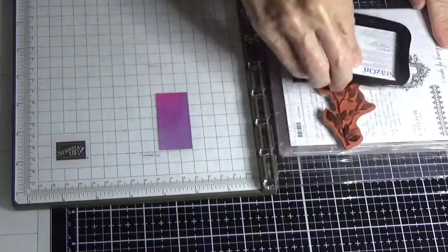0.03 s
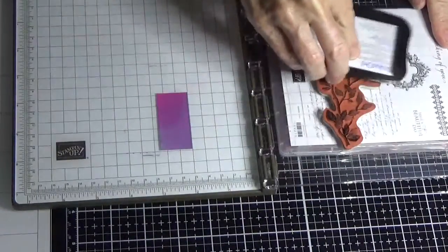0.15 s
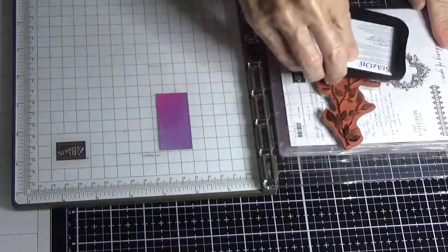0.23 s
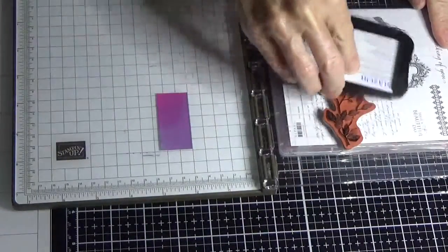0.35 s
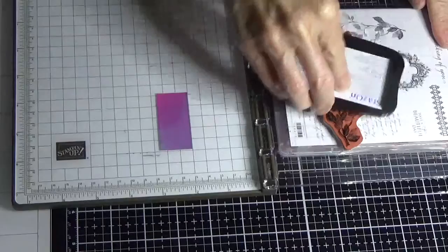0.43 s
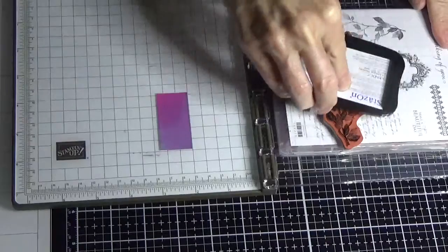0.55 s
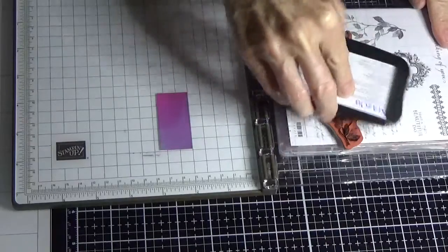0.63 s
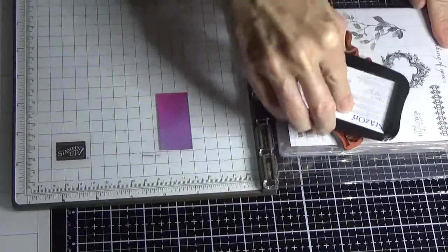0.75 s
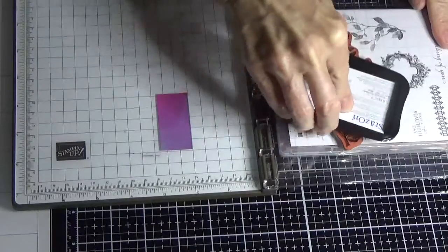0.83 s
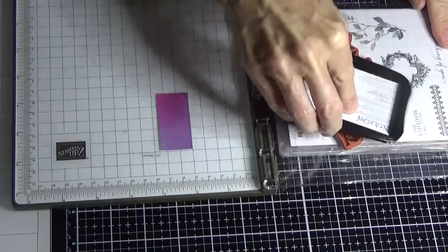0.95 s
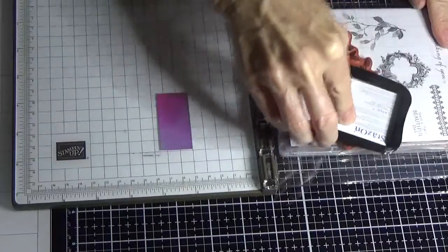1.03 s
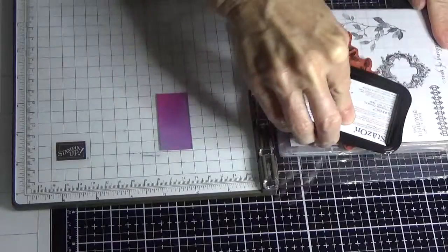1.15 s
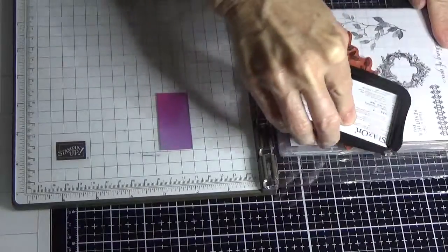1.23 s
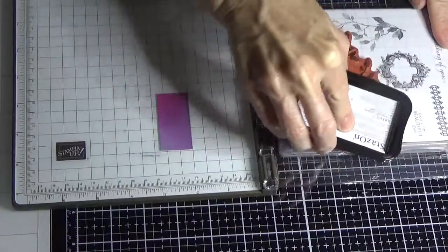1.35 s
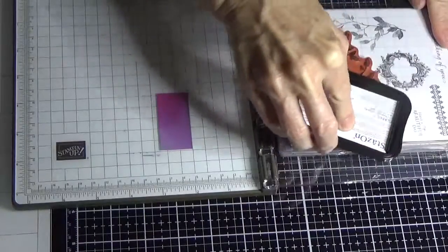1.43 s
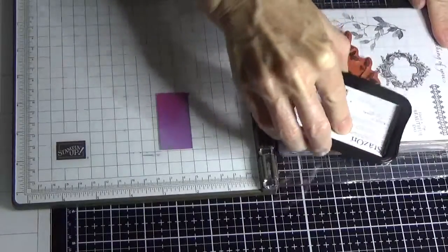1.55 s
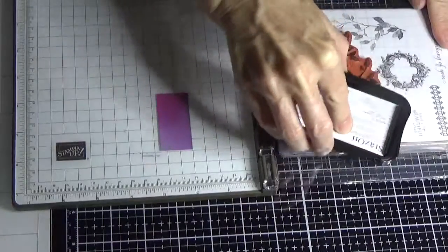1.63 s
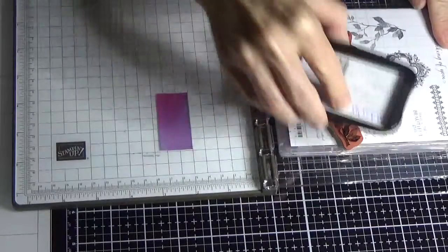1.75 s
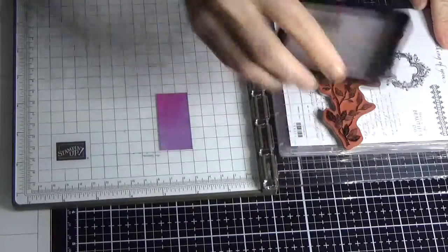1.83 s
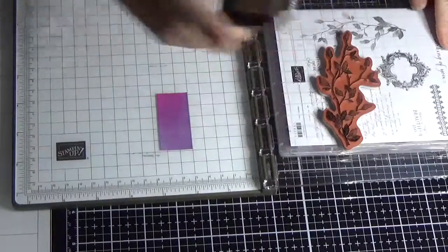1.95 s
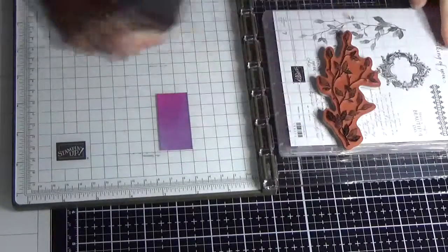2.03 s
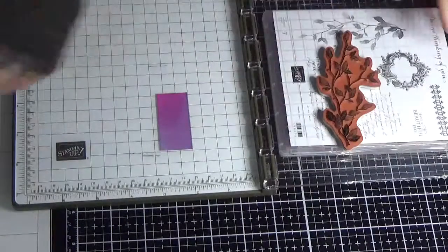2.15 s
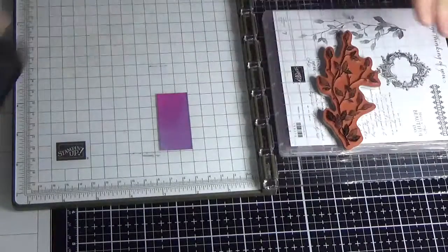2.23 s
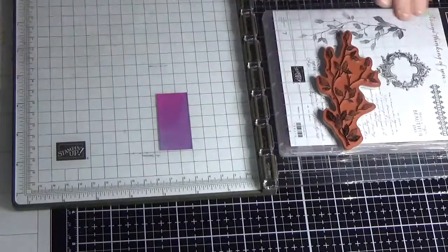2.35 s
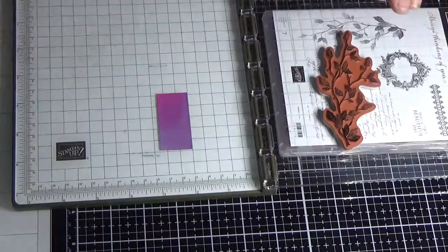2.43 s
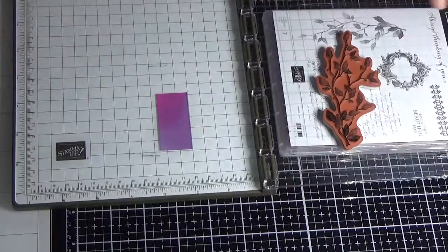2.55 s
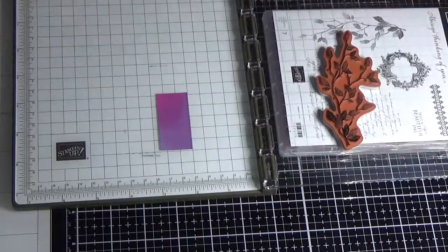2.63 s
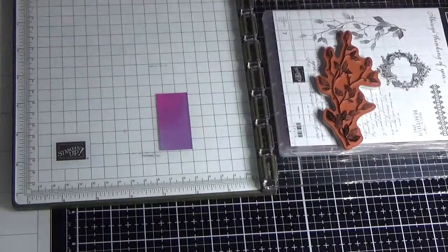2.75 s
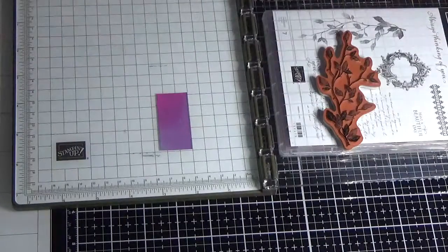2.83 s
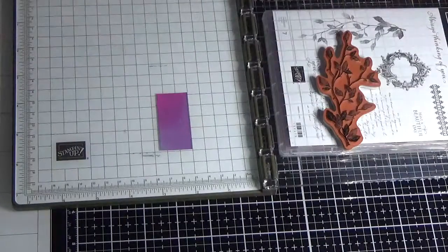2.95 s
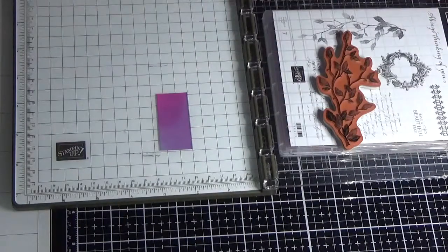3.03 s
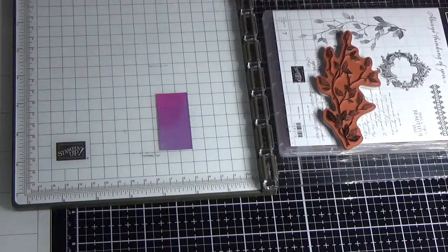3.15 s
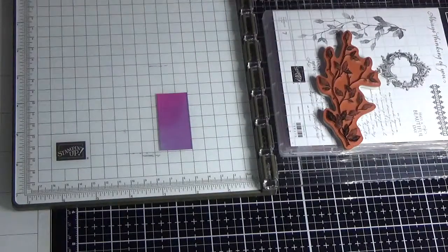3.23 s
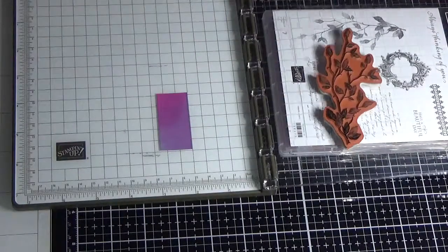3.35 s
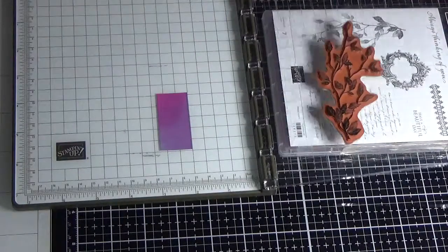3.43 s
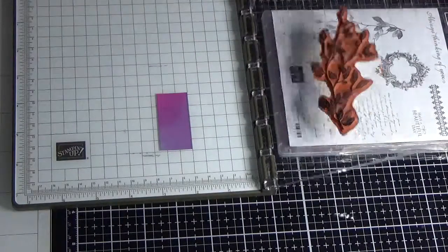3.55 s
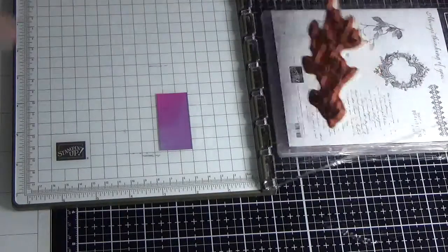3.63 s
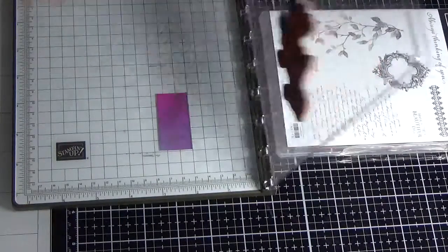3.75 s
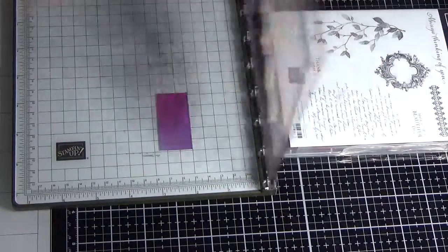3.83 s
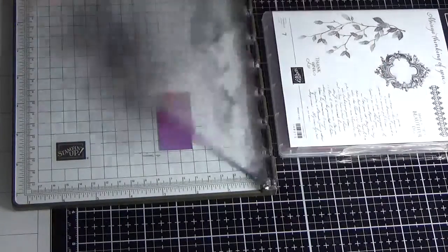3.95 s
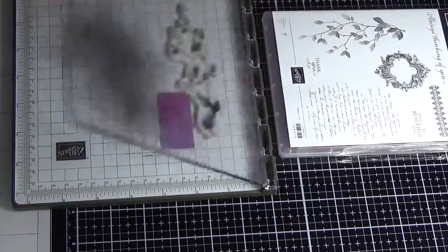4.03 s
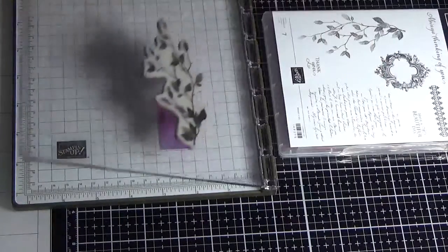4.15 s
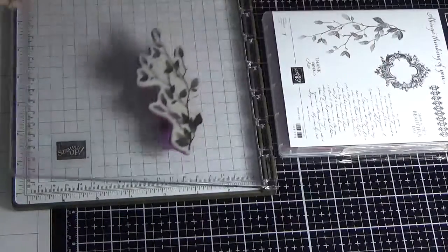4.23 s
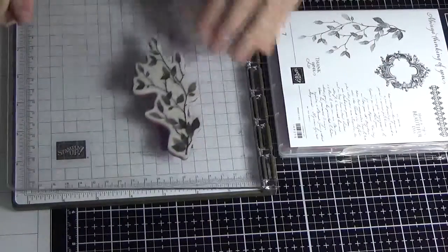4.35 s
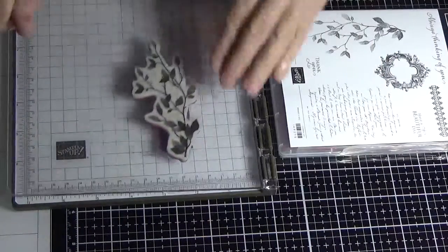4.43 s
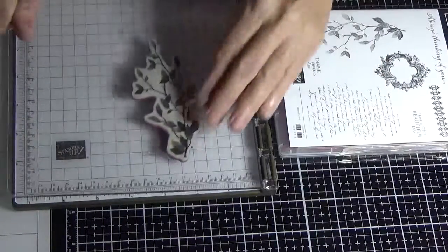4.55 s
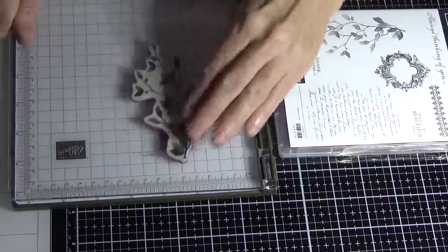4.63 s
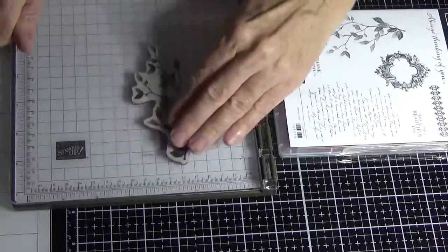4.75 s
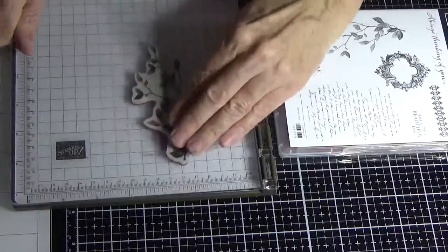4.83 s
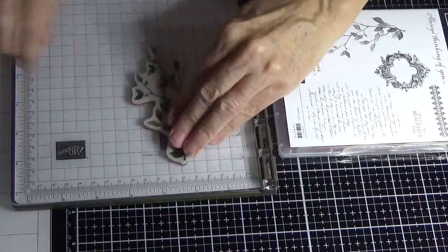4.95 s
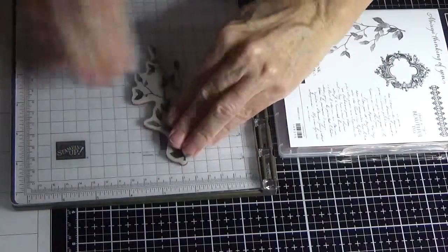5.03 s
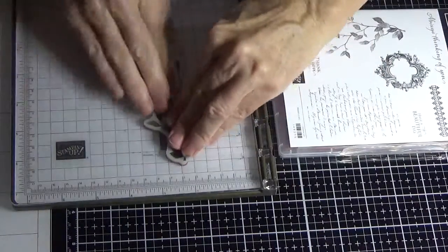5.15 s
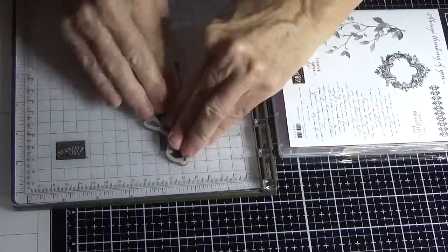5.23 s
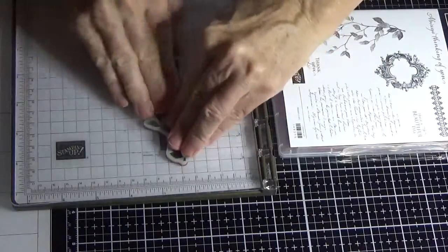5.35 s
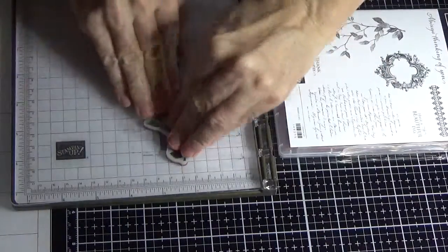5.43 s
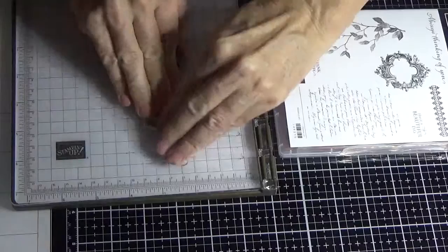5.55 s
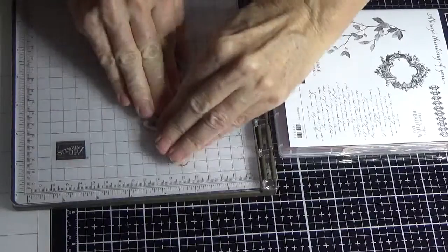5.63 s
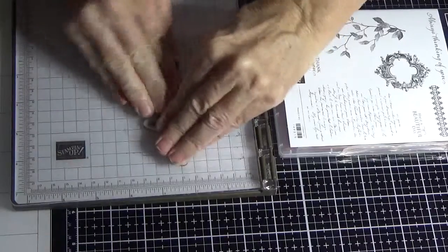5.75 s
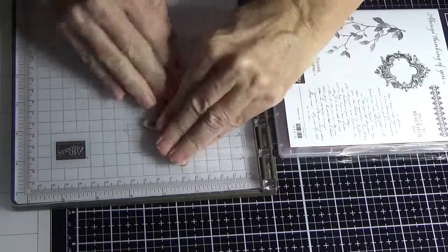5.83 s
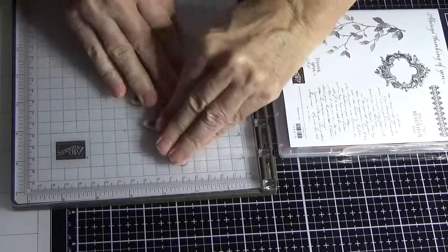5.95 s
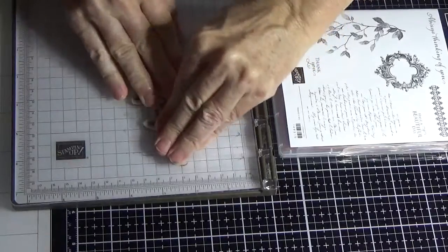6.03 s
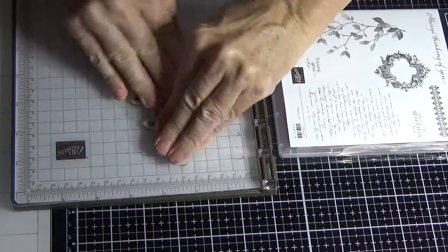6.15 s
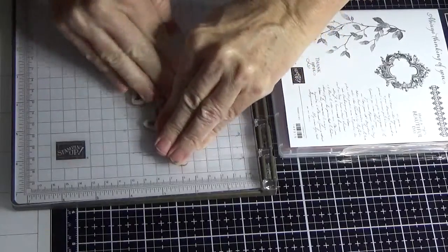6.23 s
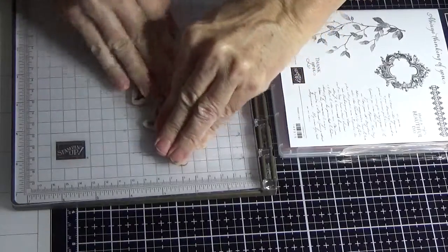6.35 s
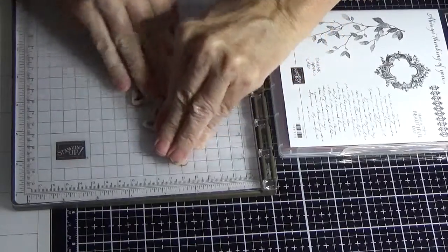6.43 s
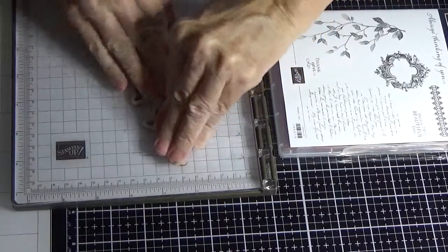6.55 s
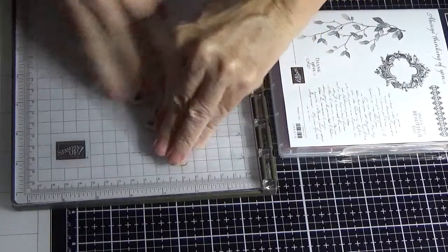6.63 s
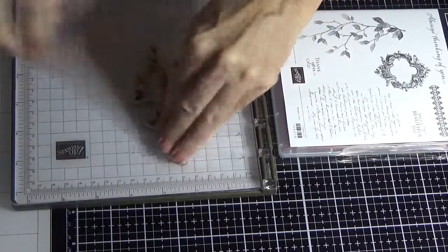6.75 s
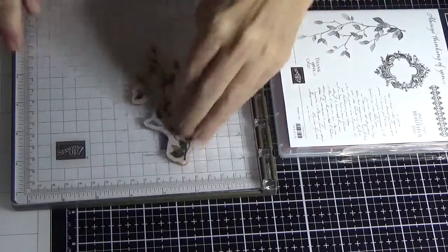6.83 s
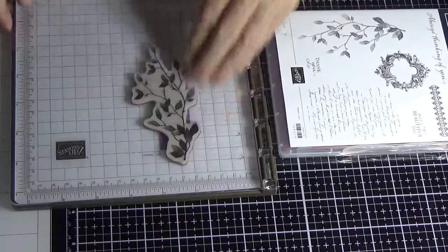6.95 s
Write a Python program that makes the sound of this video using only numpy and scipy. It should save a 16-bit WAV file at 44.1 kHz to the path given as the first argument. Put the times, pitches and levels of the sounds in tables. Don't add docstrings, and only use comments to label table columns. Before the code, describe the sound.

Close on a desk, a pad case knocks dully, its cap drops and rattles sharply, and a hinged plate settles with small plastic clicks.

```python
import sys
import numpy as np
from scipy import signal
from scipy.io import wavfile

SR = 44100
rng = np.random.default_rng(int(sys.argv[2]) if len(sys.argv) > 2 else 0)


def pcm_store(signal):
    levels = np.round(np.clip(np.atleast_2d(signal), -1, 1) * 32767)
    wavfile.write(sys.argv[1], SR, levels.astype(np.int16).T)


def nominal_scale(level):
    x = np.asarray(level, float) / 20
    return 10 ** x


N = 308126


def rms_one(x):
    return x / np.sqrt(np.mean(x ** 2) + 1e-20)


def filtered(x, order, hz, kind="low"):
    return signal.sosfilt(signal.butter(order, hz, kind, fs=SR, output="sos"), x)


def small(x, hz):
    return filtered(x, 3, hz, "high")


def at_hz(points, hz):
    table_hz, value = np.array(points)[:, :2].T
    return np.interp(np.log(hz), np.log(table_hz), value)


def drift(rate):
    knots = rng.standard_normal(int(N / SR * rate) + 2)
    return np.interp(np.linspace(0, len(knots) - 1, N), np.arange(len(knots)), knots)


def swells(rows, rise_db_per_s, fall_db_per_s):
    t = np.arange(0, N, 16) / SR
    gain = 0
    for s, db, hold_s in rows:
        rise_db = rise_db_per_s * np.maximum(s - t, 0)
        fall_db = fall_db_per_s * np.maximum(t - s - hold_s, 0)
        gain = gain + nominal_scale(db - rise_db - fall_db)
    return np.interp(np.arange(N) / SR, t, gain)


def grains(per_s, spread_db):
    sizes = nominal_scale(spread_db * np.minimum(rng.exponential(1, N), 4)) * rng.choice([-1, 1], N)
    return rms_one(sizes * (rng.random(N) < per_s / SR))


def ring(clicks, hz, t60):
    r, w = nominal_scale(-60 / (t60 * SR)), 2 * np.pi * hz / SR
    return signal.lfilter([0, np.sin(w)], [1, -2 * r * np.cos(w), r * r], clicks + 1e-18)


def crack(spectrum, db):
    modes = []
    for hz in np.geomspace(450, 10300, 20):
        modes.append((hz, db + at_hz(spectrum, hz) + 20 * np.log10(hz / 2000), 12 / hz))
    return modes


def strike(blows, modes, trim_db, spread_s, buzz_db, buzz_s, rub=0):
    s, db, low_db, high_db = np.transpose(blows)
    first, last = int(s.min() * SR), min(int(s.max() * SR) + SR // 2, N)
    rub = (rub + np.zeros(N))[first:last]
    log_hz = np.log(np.array(modes)[:, 0])
    place = np.interp(log_hz, [log_hz.min(), log_hz.max()], [-1, 1])
    chance, out = rng.random((len(s), 3, len(modes))), np.zeros(N)
    noise = nominal_scale(buzz_db) * rng.standard_normal((3, last - first))
    fade = nominal_scale(-60 / (buzz_s * SR))
    for k, (hz, mode_db, t60) in enumerate(modes):
        colour_db = low_db * max(-place[k], 0) + high_db * max(place[k], 0)
        if hz * t60 < 13:
            delay, sign = 0, (-1) ** k
        else:
            delay, sign = spread_s * chance[:, 0, k], np.sign(chance[:, 2, k] - .5)
        clicks = np.zeros(last - first)
        at = ((s + delay) * SR).astype(int) - first
        clicks[at] = sign * nominal_scale(db + colour_db + trim_db + 3.3 * (chance[:, 1, k] - 1.0))
        buzz = noise[k % 3] * signal.lfilter([1], [1, -fade], np.abs(clicks) + 1e-18)
        out[first:last] += nominal_scale(mode_db) * ring(clicks + buzz + rub, hz, t60)
    return out


# (f/Hz, level/dB per Hz)
FLOOR = [(25, 1), (125, -3), (509, -7), (893, -6.5), (1180, -14.5), (1570, -10.5), (1690, -11.5),
         (3120, -15.5), (3460, -9), (3730, -15), (9860, -21.5)]
# (f/Hz, likeness 0-1)
LIKENESS = [(60, 0.93), (130, 1), (270, 0.38), (570, 0.067), (1200, 0.3), (2600, 0.8), (5500, 0.59),
            (11000, 0.89)]
# (f/Hz, width/Hz, level/dB)
FAN = [(1423, 11, -74), (1542, 30, -74), (2090, 58, -77)]
# (t/s, level/dB above the room's rumble)
RUMBLE = [
    (0.0, 15),
    (1.5, -19),
    (2.98, 0),
    (3.299, 11.5),
    (4.45, 2),
    (6.62, 3.5),
    (6.95, 4),
]


def air():
    stir = swells([(s, db, 0) for s, db in RUMBLE], rise_db_per_s=39, fall_db_per_s=99.5)
    rumble_db = 20 * np.log10(nominal_scale(-1.0) + stir)
    out, edges = 0, 25 * 2 ** np.arange(0, 9.5, .5)
    white = rng.standard_normal((2, 2, N))
    for k, (low, high) in enumerate(zip(edges, edges[1:])):
        mid, side = filtered(white[k % 2], 2, [low, high], "band")
        hz = np.sqrt(low * high)
        alike = np.clip(at_hz(LIKENESS, hz), 0, 1)
        stirred_db = rumble_db * at_hz([(300, 0.38), (900, 0.16)], hz)
        gain = nominal_scale(at_hz(FLOOR, min(hz, 9800)) + stirred_db + 0.51 * drift(11.0))
        out = out + gain * (np.sqrt(1 + alike) * mid + np.sqrt(1 - alike) * side * [[1], [-1]])
    out = nominal_scale(-63.5 + 2.0) * rms_one(out)
    for hz, width_hz, db in FAN:
        t60 = np.log(1000) / (np.pi * width_hz)
        out = out + nominal_scale(db) * rms_one(ring(rng.standard_normal((2, N)), hz, t60))
    return out


# (f/Hz, t60/s)
ROOM_T60 = [(200, 0.44), (1200, 0.35), (4000, 0.29), (11000, 0.35)]


def room(x, width):
    t = np.arange(SR * 3 // 4) / SR
    echoes, edges = 0, [40, 400, 900, 2000, 5000, 14000]
    for low, high in zip(edges, edges[1:]):
        band = filtered(rng.standard_normal((2, len(t))), 2, [low, high], "band")
        echoes = echoes + band * nominal_scale(-60 * t / at_hz(ROOM_T60, np.sqrt(low * high)))
    mid, side = echoes * np.clip((t - .004) / 0.0028, 0, 1)
    side = filtered(side, 2, 450, "high")
    side = side + 0.36 * small(side, 1200)
    return signal.fftconvolve(x[None], np.array([mid + width * side, mid - width * side]), axes=1)[:, :N]


def camera():
    first_s, period_s = .0305, .08
    at = (np.arange(first_s, N / SR, period_s) * SR).astype(int)
    steps = np.zeros(N)
    steps[at] = nominal_scale(-57.5 + 0.85 * rng.standard_normal(len(at)))
    return ring(steps, 3450, 0.029) + .5 * ring(steps, 2900, 0.031) + 0.42 * ring(steps, 4200, .01)


# (loudest at t/s, level/dB, hold/s)
SLEEVE = [(1.132, -68.5, 0.0046), (1.748, -66, 0.012), (2.05, -65.5, 0.014), (2.356, -68.5, 0.057),
          (3.93, -68, .04), (4.166, -72, .02), (4.456, -81, 0.009), (4.87, -68.5, 0.045),
          (5.13, -72, 0.045), (5.73, -72, .01), (6.23, -76, 0.024), (6.5, -70.5, 0.092), (6.9, -70, 0.03)]


def sleeve():
    shared, left, right = [grains(9000, spread_db=3) for _ in range(3)]
    bright = filtered([shared + .5 * left, shared + .5 * right], 2, [5500, 11000], "band")
    return nominal_scale(2.0) * swells(SLEEVE, rise_db_per_s=250, fall_db_per_s=300) * rms_one(bright)


# (t/s, peak level/dB, low-mode extra/dB, high-mode extra/dB)
THUMPS = [(0.002, -54, 25, 19), (0.186, -34.5, 9, -6), (0.446, -26, 1, 7), (0.735, -22.5, 1, 1.5),
          (1.052, -28, -1, 7), (1.319, -31, 6.5, 0), (1.542, -28.5, 4, -8), (1.758, -53, 16, -14),
          (2.562, -39.5, -5, 2), (2.928, -48.5, -39, 9.5), (3.134, -36.5, 5, 19), (3.33, -44, -12, -6),
          (3.54, -45.5, -19, -8), (3.807, -43, -6, -22), (3.954, -32.5, -9, -48), (4.111, -51, 5, -15),
          (4.588, -46.5, -6, -5), (4.837, -40.5, -5, -13), (5.018, -42, -13, -5), (5.151, -50, 15.5, -12),
          (5.832, -42.5, -6, 9), (5.921, -46, 12, -2), (6.381, -41.5, -16, 14.5), (6.735, -42.5, -8, -5),
          (6.901, -50, -11, 4)]
# (f/Hz, level/dB, t60/s)
DESK = [(47.2, -3, 0.23), (63, -2, 0.12), (128.7, -2.5, 0.14), (148, -1.5, 0.2), (200, -3, .18),
        (224.4, -3, 0.1), (324, -2, 0.043), (346, -6.5, 0.033), (496, -5.5, 0.03)]


def desk():
    return filtered(strike(THUMPS, DESK, -8.5, 0.00613, buzz_db=-40, buzz_s=0.14), 2, 600)


# (t/s, peak level/dB, f/Hz)
TICKS = [
    (1.793, -44.5, 2200),
    (4.668, -42, 7820),
    (4.8475, -41, 3800),
    (4.8618, -38, 2930),
    (4.916, -35.5, 2520),
    (5.348, -29, 3880),
    (5.899, -32, 2570),
    (6.576, -49, 5180),
]


def ticks():
    out = 0
    for s, db, hz in TICKS:
        modes = [(hz * .75, -8, .003), (hz, -5, .009), (hz * 1.2, -6, .003), (hz * 1.5, -8, .002)]
        out = out + strike([(s, db, 0, 0)], modes, -2.3, 0.0003, buzz_db=-19.5, buzz_s=0.023)
    return small(out, 1800)


# (t/s, peak level/dB, low-mode extra/dB, high-mode extra/dB)
PRESSES = [(3.322, -32.5, 0, -34), (3.451, -49.5, 10, 6), (3.464, -52, 11, -9), (3.493, -51, 22.5, -16),
           (3.788, -58, 12, -6), (4.006, -51, -9, -6), (4.58, -56, 34.5, -23), (4.797, -63.5, 33.5, -10),
           (4.834, -36, 5.5, -34), (5.014, -25.5, -3, -14), (5.834, -17, -27.5, -6), (6.39, -35.5, 10, 17),
           (6.502, -43.5, -19, -4), (6.708, -54.5, 14, 6), (6.831, -39.5, -30, -2)]
# (f/Hz, level/dB, t60/s)
PLATE = [(360, -18, 0.13), (665, -4.5, 0.093), (722.6, -5, 0.11), (885, -5, 0.034), (1047, -1, 0.1),
         (1170, -21, 0.057), (1550, 2, 0.014), (1830, 3.5, 0.016), (2380, 1, 0.013), (3170, 0, .008),
         (4010, -4, .008), (4870, -9.5, 0.0083)]
# (f/Hz, level/dB per Hz)
PLATE_CRACK = [(450, -50), (1040, 3.5), (1400, 4), (2100, -10), (2640, 5.5), (4800, -8.5), (10300, -45)]
# (loudest at t/s, level/dB, hold/s)
CREAKS = [
    (3.51, -58, .02),
    (3.96, -58.5, .005),
    (4.25, -59.5, 0.014),
    (6.33, -59.5, 0.013),
    (6.502, -58, 0.026),
    (6.73, -63, 0.04),
    (6.91, -57.5, 0.013),
]


def plate():
    slips = nominal_scale(-30.5) * swells(CREAKS, rise_db_per_s=250, fall_db_per_s=300) * grains(700, spread_db=2.5)
    slips = filtered(slips, 2, 1200)
    modes = PLATE + crack(PLATE_CRACK, 2.9)
    return strike(PRESSES, modes, -11, 0.0012, buzz_db=-20.5, buzz_s=0.037, rub=slips)


# (f/Hz, level/dB, t60/s)
DESK_HUM = [(72, -2, 0.17), (196, -0.5, 0.28), (246, -8, 0.087), (357, 3.5, .06)]
# (t/s, peak level/dB, low-mode extra/dB, high-mode extra/dB)
CLATTER = [
    (2.563, -0.5, -37, -7),
    (2.572, -11, 10, -5),
    (2.634, -10, 3.5, 2),
    (2.915, -18.5, 9.5, -17.5),
    (3.064, -16, -3.5, -4),
    (3.1025, -5.5, -20, 0.5),
    (3.113, -9.5, -21.5, 13),
    (3.123, -9.5, 6.5, 11),
    (3.0597, -16.5, -7, -19.5),
]


def cap_on_desk():
    hits = [(s, db, 0, 0) for s, db, low_db, high_db in CLATTER]
    return filtered(strike(hits, DESK_HUM, -44.5, 0.0092, buzz_db=-24.5, buzz_s=0.18), 2, 500)


# (f/Hz, level/dB, t60/s)
CAP = [(770.3, -15.5, 0.15), (1035, -21.5, .08), (1733, -17, .04), (1867, -22, 0.017), (3800, -16, 0.023),
       (2210, -11, 0.052), (2380, -12, 0.027), (2400, -16, 0.035), (2680, -27.5, .03), (3000, -28, 0.027),
       (3204, -9.5, .022), (4830, -10, 0.01), (5290, -16.5, .015)]
# (f/Hz, level/dB per Hz)
CAP_CRACK = [(450, -24), (754, -17.5), (1250, -28), (2000, -1.5), (2700, 5), (4170, -5), (5130, -2.5),
             (6760, -16.5), (8200, -2), (10800, -24.5), (14000, -43)]


def cap():
    rocking = [(3.112, -23, 0.027)]    # (t/s, level/dB, hold/s), sudden start
    rattle = swells(rocking, rise_db_per_s=np.float64(SR), fall_db_per_s=200.5)
    rattle = small(nominal_scale(-19.5) * rattle * grains(3000, spread_db=0.5), 2000)
    modes = CAP + crack(CAP_CRACK, -2.3)
    return strike(CLATTER, modes, -12, .0008, buzz_db=-21.5, buzz_s=0.045, rub=rattle)


# (t/s, peak level/dB, low-mode extra/dB, high-mode extra/dB)
DABS = [(0.002, -43.5, 4, -1), (0.182, -42, 16, -15), (0.188, -36, 3, -30), (0.448, -29, 11, 12),
        (0.451, -25, 3, 13), (0.732, -33.5, 5, 9), (0.737, -28, -2, 5), (1.058, -27, -4, -50),
        (1.129, -54, 9, -3), (1.324, -37.5, 12, 17), (1.333, -42, 3, 10), (1.543, -39, 1, -3),
        (1.55, -31, 0, -5), (1.575, -49.5, 15, -9), (1.75, -46, -16, 8)]
# (f/Hz, level/dB, t60/s)
PAD = [(597, -8.5, 0.066), (690, -4.5, 0.065), (1005, -5.5, 0.012), (1236, 2, 0.017), (1550, -3, 0.023),
       (2004, -4, 0.018), (2930, -9, 0.029)]
# (f/Hz, level/dB per Hz)
PAD_CRACK = [(400, 12.5), (704, -5), (947, -6), (1240, 5.5), (1400, 2), (2980, -2), (10300, -47)]


def pad():
    return strike(DABS, PAD + crack(PAD_CRACK, 4.7), -10.0, .004, buzz_db=-23.5, buzz_s=0.041)


def scene():
    near = small(pad(), 200) + small(cap(), 790) + small(plate(), 317) + ticks()
    low = desk()
    highs = filtered(near, 2, 2200, "high")
    lean = .15 * highs - 0.056 * near
    direct = near + lean * [[1], [-1]] + low
    wet = nominal_scale(-35.5) * near + nominal_scale(-34.5) * low
    return direct + room(wet, width=0.4) + camera() + sleeve() + air() + cap_on_desk()


def band_limit(x):
    return signal.sosfilt(signal.butter(12, 12190, fs=SR, output="sos"), x)


def record(dry):
    x = filtered(dry, 2, 38, "high")
    x = signal.sosfilt(signal.cheby1(14, .5, 11000, fs=SR, output="sos"), x)
    return band_limit(x)


dry = scene()
out = record(dry)
pcm_store(out)
```